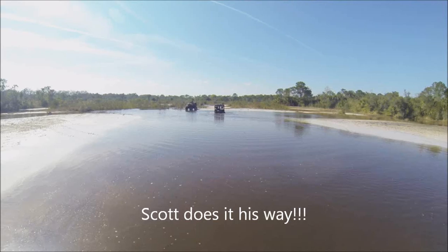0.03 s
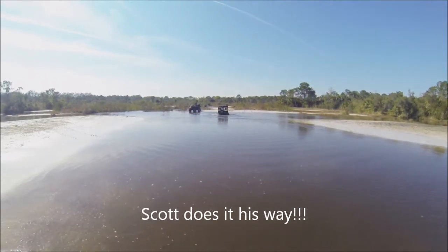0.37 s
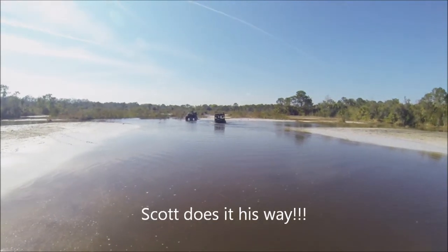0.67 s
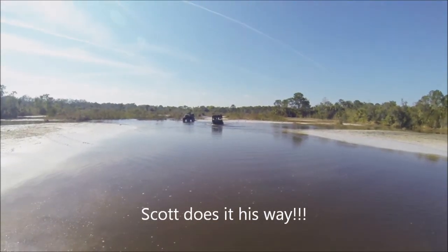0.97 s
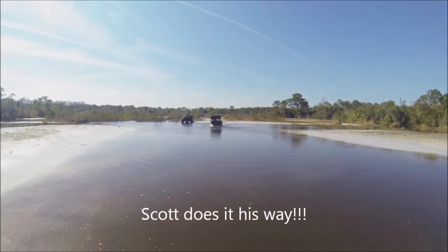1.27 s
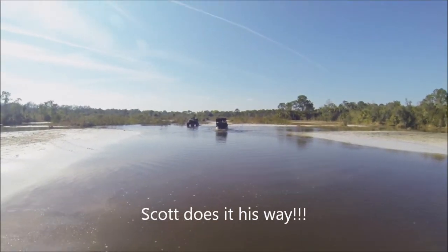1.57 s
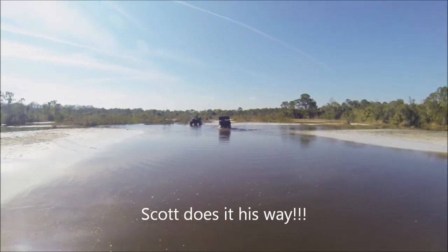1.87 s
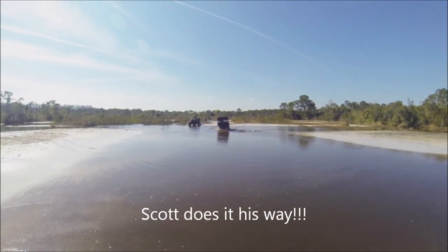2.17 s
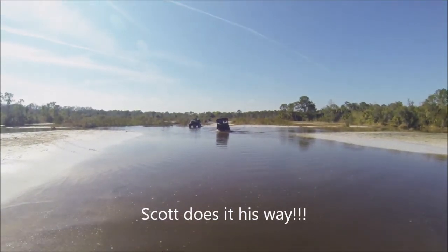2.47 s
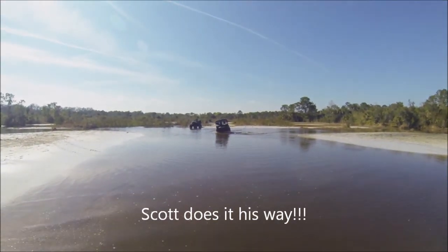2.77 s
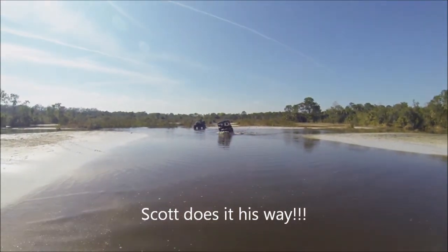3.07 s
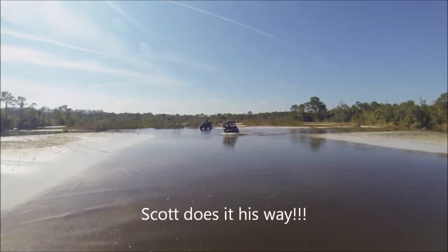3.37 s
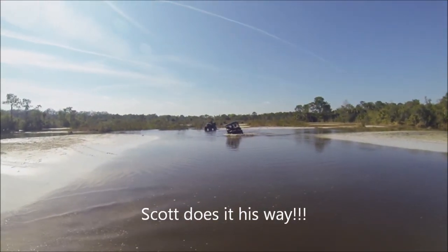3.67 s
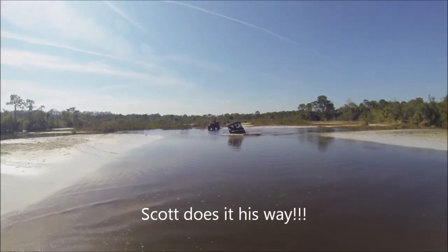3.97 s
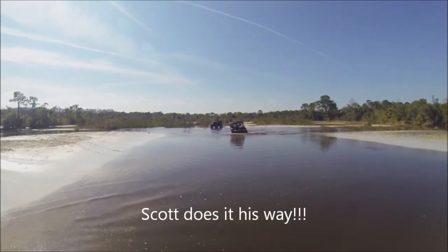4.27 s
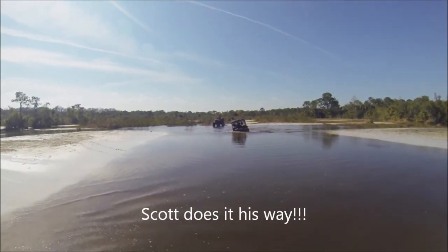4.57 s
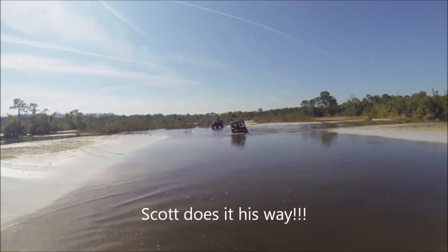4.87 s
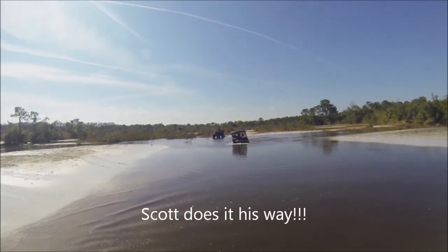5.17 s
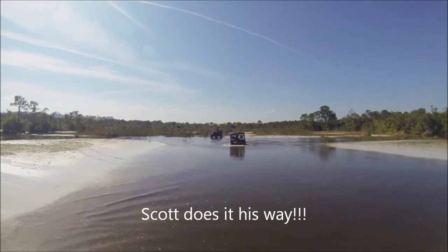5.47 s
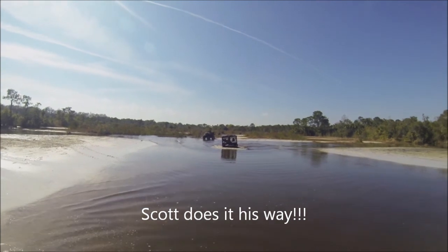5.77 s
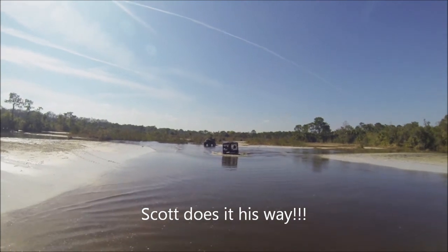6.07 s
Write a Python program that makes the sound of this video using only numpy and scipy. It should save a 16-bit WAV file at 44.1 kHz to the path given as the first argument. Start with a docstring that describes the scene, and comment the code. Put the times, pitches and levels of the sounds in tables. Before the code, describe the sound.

Low wind rumbles on a microphone inside a plastic case, over the faint drone of distant off-road vehicles and a soft wash of river water. A sharp click and scattered dull knocks sound right at the microphone. The mount rubs with a quick judder and gives a few faint squeaks. Near the end it creaks in a loud burst of sharp knocks, followed by one harder crack.

```python
"""A shallow river, with off-road vehicles wading through it far from the microphone.
The microphone sits in a camera's plastic case: wind rumbles on the shell, over a faint exhaust
drone and the wash of water. Right at the microphone something rubs on the mount, judders as it
sticks and slips, and squeaks; later the mount creaks in a burst of sharp knocks that ring the case."""
import sys
import numpy as np
from scipy import signal
from scipy.fft import rfft, irfft
from scipy.io import wavfile
from scipy.ndimage import uniform_filter1d

SR = 44100
rng = np.random.default_rng(int(sys.argv[2]) if len(sys.argv) > 2 else 0)


def wav_record(signal):
    """Record a signal, one row per channel, as 16-bit PCM in the file named by sys.argv[1]."""
    frames = np.transpose(np.atleast_2d(signal))
    bounded = np.clip(frames, -1, 1)
    # unit amplitude maps onto the largest positive 16-bit level
    quanta = np.round(bounded * 32767).astype(np.int16)
    wavfile.write(sys.argv[1], SR, quanta)


N = 269892
T = np.arange(N) / SR
HZ = np.fft.rfftfreq(N, 1 / SR)


def amp(db):
    """Decibels to gain."""
    return 10 ** (np.asarray(db) / 20)


def unit(x):
    """Scales to rms 1."""
    return x / np.sqrt(np.mean(x ** 2) + 1e-20)


def curve(rows, column=1):
    """One column of a table, joined by straight lines in time."""
    rows = np.asarray(rows, float)
    return np.interp(T, rows[:, 0], rows[:, column])


def during(start, end, attack, release):
    """Attack, hold at one, release."""
    return np.clip(np.minimum((T - start) / attack, (end - T) / release), 0, 1)


def build_up(start, length_s, depth_db):
    """A level in dB that climbs from depth_db below to zero, then holds."""
    return -depth_db * np.clip(1 - (T - start) / length_s, 0, 1)


def colour(points, hz=HZ):
    """Gain of a spectrum given as (frequency [Hz], level [dB]) points."""
    f, db = np.transpose(points)
    return amp(np.interp(np.log(hz + 1), np.log(f + 1), db))


def resonant(modes, hz=HZ):
    """Gain of a set of steep-sided resonances."""
    peaks = (amp(db) / (1 + ((hz ** 2 - f ** 2) / (hz * width + 1)) ** 2) for f, width, db in modes)
    return np.sqrt(sum(peak ** 2 for peak in peaks))


def filtered(x, gain):
    """Shapes the spectrum of x and scales to rms 1."""
    return unit(irfft(rfft(x) * gain, N))


def noise(gain):
    """Noise of rms 1 with the given spectrum."""
    return filtered(rng.standard_normal(N), gain)


def wander(hz):
    """Random drift of rms 1, up to about hz."""
    coarse = T[::32]
    f = np.fft.rfftfreq(len(coarse), coarse[1])
    slow = irfft(rfft(rng.standard_normal(len(coarse))) * np.exp(-(f / hz) ** 2), len(coarse))
    return np.interp(T, coarse, unit(slow))


def add(mix, start, sound):
    """Mixes a sound in at start seconds."""
    part = mix[max(round(start * SR), 0):][:len(sound)]
    part += sound[:len(part)]


def causal(gain):
    """The quickest impulse response that has this gain."""
    log_gain = np.log(np.maximum(np.r_[gain, gain[-2:0:-1]], gain.max() * 1e-5))
    return np.fft.ifft(np.exp(np.conj(signal.hilbert(log_gain)))).real


# wind at the microphone: (time [s], relative rumble level [dB], relative buffeting level [dB])
WIND_LEVELS = [(0.2, -44.5, -63), (0.35, -44.5, -73.5), (0.8, -37, -53), (1.55, -40, -56),
               (2.45, -39.5, -51), (2.6, -36, -57.5), (3.2, -42, -57.5), (3.35, -37, -56.5),
               (3.8, -44, -58), (3.95, -38, -59.5), (4.4, -43, -56.5), (4.85, -35.5, -47),
               (5.0, -31, -46.5), (5.45, -37, -53), (6.1, -36, -50.5)]
# spectra of the rumble and the buffeting: (frequency [Hz], level [dB])
RUMBLE_COLOUR = [(8, -17), (15, 1.5), (28, 2), (40, 2.5), (55, -3), (75, -7), (100, -12), (140, -27.5),
                 (220, -49), (600, -100)]
BUFFET_COLOUR = [(60, -20.5), (110, 2), (160, -3.5), (210, -8), (260, -14), (400, -18.5), (600, -26),
                 (1500, -54), (5000, -100)]
def wind(gain_db=1, gust_db=1.5, flutter_db=2.5):
    """Lumpy low turbulence right on the case, and faster buffeting above it."""
    gusts_db = gain_db + gust_db * wander(hz=3.8)
    rumble = noise(colour(RUMBLE_COLOUR)) * amp(curve(WIND_LEVELS) + gusts_db)
    buffet = noise(colour(BUFFET_COLOUR)) * amp(curve(WIND_LEVELS, column=2) + gusts_db)
    return rumble + buffet * amp(flutter_db * wander(hz=25))


# engine far out in the river: (time [s], firing rate [Hz], relative level [dB])
ENGINE_RUN = [(.07, 72.9, -56), (.6, 72.85, -50.5), (1.1, 72.23, -43), (1.6, 68.4, -47.5),
              (2.3, 70.44, -52), (2.75, 68, -47), (3.1, 69, -56.5), (3.92, 71.9, -47.5), (4.15, 63, -48),
              (4.5, 66.7, -53), (5.45, 66.65, -50.5), (6.12, 71.2, -45)]
# exhaust orders: (multiple of the firing rate [ratio], level [dB])
EXHAUST_ORDERS = [(1, 6), (1.5, -9), (2, -11), (2.5, -16.5), (3, -13)]
def engine(gain_db=-3.5, waver_db=2.0):
    """Only the lowest orders of the exhaust carry across the water; they waver."""
    firings = np.cumsum(curve(ENGINE_RUN) * (1 + .01 * wander(hz=9.9))) / SR
    drone = np.zeros(N)
    for order, db in EXHAUST_ORDERS:
        level = amp(db + waver_db * wander(hz=5.8))
        drone += level * np.sin(2 * np.pi * (order * firings + rng.random()))
    return unit(drone) * amp(curve(ENGINE_RUN, column=2) + gain_db)


# distant wash, slowly swelling and ebbing: (time [s], level [dB])
WASH_LEVELS = [(.15, -64.5), (.45, -71.5), (1, -67), (1.6, -56.5), (2.9, -56), (3.7, -62), (5.2, -63.5),
               (6.12, -55)]
# resonances of the air around the microphone in its case: (frequency [Hz], width [Hz], level [dB])
CAVITY_MODES = [(600, 1600, -19.5), (1373, 214, 1), (1684, 162, -2.5), (2177, 137, -5.5),
                (2490, 870, -17.5), (2827, 148, -17), (3070, 195, -13.5), (3510, 230, -16.5),
                (3940, 285, -15.5), (5040, 1160, -28.5)]
# thin whistles in the hiss: (frequency [Hz], width [Hz], level once swollen [dB])
WHINE_BANDS = [(5070, 91, -80), (10400, 250, -89), (11000, 200, -90)]
# background hiss: (frequency [Hz], level [dB])
HISS_COLOUR = [(200, 0), (500, 10.5), (1100, 9), (2000, 4), (3500, -2), (4500, -4), (5130, -3),
               (6500, -6.5), (8000, -6), (9500, -9.5), (11000, -16), (12000, -11), (15000, -15)]
def water(ripple_db=1.75, hiss_db=-66):
    """A restless wash heard through the case, over a hiss and thin whine that swell, then hold."""
    wash = noise(resonant(CAVITY_MODES)) * amp(curve(WASH_LEVELS) + ripple_db * wander(hz=40))
    whine = sum(amp(db) * noise(resonant([(f, width, 0)])) for f, width, db in WHINE_BANDS)
    hiss = amp(hiss_db) * noise(colour(HISS_COLOUR))
    return wash + (hiss + whine) * amp(build_up(0, length_s=0.98, depth_db=16.5))


# handling bumps: (time [s], envelope peak [dB], frequency [Hz], decay [s])
CASE_BUMPS = [(0.072, -21.5, 62.6, 0.0024), (0.083, -29.5, 309, 0.0025), (0.103, -31, 133, 0.0047),
              (.117, -25.5, 34.7, .0063), (.983, -39.5, 263, 0.0037), (5.328, -29.5, 187, 0.0019),
              (5.7907, -25.5, 352.6, 0.0011)]
def bumps():
    """Dull pushes on the case, each a heavily damped low swing."""
    out, t = np.zeros(N), T[:SR // 5]
    for start, db, hz, decay in CASE_BUMPS:
        envelope = t / decay * np.exp(1 - t / decay)
        add(out, start, amp(db) * envelope * np.sin(2 * np.pi * hz * t))
    return out


# knocks right at the microphone: (time [s], level of the blow over 5 ms [dB], hardness [dB])
CASE_KNOCKS = [(0.0739, -32.5, -3), (0.0992, -34, -12), (.1085, -23.5, 20), (0.3604, -56.5, 2),
               (0.724, -33, 0), (0.882, -39, 4.5), (.986, -41, -3), (1.041, -43, -2), (1.0516, -38.5, -1.5),
               (1.1413, -32.5, -5), (1.2049, -34, -5.5), (1.3165, -34, -5.5), (2.0995, -36.5, -4),
               (2.8657, -35.5, -3), (4.218, -35, -3.5), (4.3282, -35.5, -1), (4.4468, -37.5, 0),
               (4.7508, -27, 6), (4.852, -25, 2), (4.8835, -19.5, 0), (4.8925, -29.5, 2),
               (4.9233, -18.7, -1), (4.9432, -20, 1.5), (4.9458, -21.5, -8), (4.9865, -17, 1.5),
               (5.0099, -17.5, -0.5), (5.058, -14.5, 0.5), (5.0734, -18.5, -3), (5.1174, -15.5, 0.5),
               (5.155, -32, -18), (5.1731, -20, -0.5), (5.2273, -20, -2.5), (5.2475, -19, -1),
               (5.6721, -43, 4), (5.7922, -21.5, 5), (6.079, -9.5, 2), (6.0962, -20.5, -5)]
# the case's short ring, and the thud a soft blow adds: (frequency [Hz], width [Hz], level [dB])
CASE_MODES = [(210, 155, -12), (677, 244, -11), (812, 120, -7.5), (1272, 220, 0), (1634, 383, -1.7),
              (2458, 339, -17.5), (2895, 168, -17.5), (3320, 259, -24.7), (3730, 271, -18),
              (5178, 806, -27.6), (6484, 305, -41.2), (7821, 719, -44.7), (12000, 8000, -60)]
THUD_MODES = [(327, 450, -14), (1070, 200, -8.5)]
# a hard blow trades bass for treble: (frequency [Hz], gain per dB of hardness [dB/dB])
HARDNESS_TILT = [(800, -0.47), (1200, -0.17), (1800, 0.043), (2550, 1), (3600, 0.6), (5200, 0.53),
                 (9000, .75)]
# case modes that outlast a blow: (frequency [Hz], level [dB], t60 [s], starts flat by [share])
LONG_MODES = [(902, -25, 0.098, 0.059), (1330, -27, 0.027, 0.042), (3050, -34, 0.18, 0.035),
              (4114, -14, 0.026, .133)]
def knocks(detune=.022, spot_db=1.74, contact_hz=13200, bend_s=0.0022, ring_rise_s=0.011,
           rattle_db=-22, rattle_t60=0.0373, rattle_rise_s=0.0023):
    """Sharp blows ring the case for a few ms; a few longer modes and a faint rattle follow."""
    out, t = np.zeros(N), T[:4096]
    hz = np.fft.rfftfreq(len(t), 1 / SR)
    thud = resonant(THUD_MODES, hz)
    for start, db, hard_db in CASE_KNOCKS:
        force = np.interp(db, [-34, -22], [.1, 1])  # soft blows thud, strong ones start the long modes
        treble_loss = 1 + (1 - force) * (hz / contact_hz) ** 4
        tilt = colour(HARDNESS_TILT, hz) ** hard_db / treble_loss
        # each blow lands on another spot and favours other modes
        ring = resonant(CASE_MODES, hz * (1 + detune * rng.uniform(-1.15, 1)))
        spot = amp(spot_db * unit(uniform_filter1d(rng.standard_normal(len(hz)), size=25)))
        blow = causal(np.hypot(ring, (1 - force) * thud) * tilt * spot)
        blow *= np.sqrt(.005 * SR) / np.linalg.norm(blow)  # the energy of 5 ms at rms 1
        for f, mode_db, t60, flat in LONG_MODES:
            pitch = f * (1 + detune * rng.uniform(-1, 1)) * (1 - flat * np.exp(-t / bend_s))
            envelope = amp(mode_db - 60 * t / t60) * (1 - np.exp(-t / ring_rise_s))
            blow += force * envelope * np.sin(2 * np.pi * np.cumsum(pitch) / SR)
        add(out, start, blow * amp(db))
    tail = rng.standard_normal(len(t)) * amp(-60 * t / rattle_t60) * (1 - np.exp(-t / rattle_rise_s))
    rattle = signal.fftconvolve(out, tail / np.linalg.norm(tail))[:N]
    return out + amp(rattle_db) * rattle


# crunch of the sliding mount: (frequency [Hz], level [dB])
GRIT_COLOUR = [(800, -20), (3000, 15.5), (5500, -4), (7000, -9.5), (14000, -16)]
def grit(share_db=-38, delay_s=0.01, grain_db=3.0):
    """After each knock the mount slides on a little with a fine, bright crunch."""
    loudness, t = np.zeros(N), T[:4096]
    slide = (t / delay_s * np.exp(1 - t / delay_s)) ** 3
    for start, db, _ in CASE_KNOCKS:
        add(loudness, start, amp(db + share_db) * slide)
    return noise(colour(GRIT_COLOUR)) * loudness * amp(-grain_db * wander(hz=298))


# close scrapes of the mount: (time of peak [s], length [s], body level [dB], fizz level [dB])
MOUNT_SCRAPES = [(0.087, 0.054, -44, -72), (0.243, 0.13, -60.5, -90), (0.67, 0.14, -59.5, -86),
                 (0.894, 0.11, -55, -85), (4.704, 0.22, -42, -77), (4.86, .12, -53.5, -76),
                 (5.162, 0.097, -45.5, -80), (5.407, .12, -47, -91), (5.74, 0.23, -54, -84),
                 (5.95, 0.094, -51.5, -71.5), (6.11, 0.083, -46, -67)]
# spectra of the friction's body and its high fizz: (frequency [Hz], level [dB])
SCRAPE_COLOUR = [(450, -21), (640, -8), (1000, -13), (1240, -1.5), (1410, -3.5), (1620, 3.5), (1830, -4.5),
                 (2000, -11.5), (2600, -19.5), (3300, -14.5), (4200, -40), (5180, -23), (6340, -46),
                 (14000, -59)]
FIZZ_COLOUR = [(4000, -25), (5500, -7), (6500, -8), (7250, 1), (7900, 4), (9200, -5), (11000, 0),
               (12200, -5), (13600, 1), (15000, -7)]
def scrapes(grain_db=4):
    """Strokes of grainy friction swell and fade as the mount takes load, with a little fizz on top."""
    body, fizz = noise(colour(SCRAPE_COLOUR)), noise(colour(FIZZ_COLOUR))
    strokes = np.zeros(N)
    for peak_s, length, body_db, fizz_db in MOUNT_SCRAPES:
        swell = 1 / np.cosh(np.pi * np.clip((T - peak_s) / length, -10, 10))
        strokes += (amp(body_db) * body + amp(fizz_db) * fizz) * swell
    return strokes * unit(amp(grain_db * wander(hz=118)))


# stick-slip on the mount: (time [s], slip rate [Hz])
SLIP_RATE = [(1.2, 31), (1.45, 26), (1.82, 29.4), (1.97, 25), (2.15, 27.8), (2.55, 27.4)]
def judder(start=1.21, end=2.547, body_db=-51, sag_db_per_s=1, fizz_db=-69, uneven_db=0.5):
    """Each slip lets go a puff of friction noise that swells fast, rings in the case and dies away."""
    jitter, rise, body_fall, fizz_fall = .08, 0.062, 0.24, 0.46  # in slip cycles
    slips = np.cumsum(curve(SLIP_RATE) * (T >= SLIP_RATE[0][0])) / SR
    since_slip = (slips + jitter * wander(hz=11.4)) % 1
    swell = np.exp(-(1 - since_slip) / rise)
    body_puffs = (swell + np.exp(-since_slip / body_fall)) * rng.standard_normal(N)
    fizz_puffs = (swell + np.exp(-since_slip / fizz_fall)) * rng.standard_normal(N)
    body = filtered(body_puffs, resonant(CAVITY_MODES)) * amp(body_db - sag_db_per_s * (T - start))
    fizz = filtered(fizz_puffs, colour(FIZZ_COLOUR))
    fizz *= amp(fizz_db + build_up(start, length_s=0.48, depth_db=15))
    envelope = during(start, end, attack=0.018, release=0.051)
    return (body + fizz) * amp(uneven_db * wander(hz=23.8)) * envelope


# close squeaks of the mount: (start [s], length [s], top pitch [Hz], time to the top [s],
# fall of pitch 0.1 s from the top [share], level off resonance [dB])
MOUNT_SQUEAKS = [(2.5, 0.12, 1176, 0.091, .22, -61), (3.15, .12, 1186, .025, 0.15, -62.5),
                 (3.417, 0.12, 1121, .02, 0.0683, -65.5)]
# their partials: (multiple of the pitch [ratio], level [dB])
SQUEAK_PARTIALS = [(1, -6), (2, 0), (3, -8), (4, -22)]
def squeak(start, length, top_hz, top_s, fall, level_db, waver=.024, flutter_db=3):
    """Slips run together into a thin, unsteady tone that arches in pitch and swells at a resonance."""
    ring_hz, ring_width_hz, ring_db = 1061, 37, 8  # near this pitch the second partial rings in the case
    pitch = top_hz * np.maximum(1 - fall * (10 * (T - start - top_s)) ** 2, .5)
    turns = np.cumsum(pitch * (1 + waver * wander(hz=200))) / SR
    tone = unit(sum(amp(db) * np.sin(2 * np.pi * k * turns) for k, db in SQUEAK_PARTIALS))
    boost_db = ring_db / (1 + ((pitch - ring_hz) / ring_width_hz) ** 2)
    level = amp(level_db + boost_db + flutter_db * wander(hz=60))
    return tone * level * during(start, start + length, attack=.03, release=.03)


def scene():
    """The far river and the close noises of wind, case and mount, all at one microphone."""
    rubbing = judder() + sum(squeak(*row) for row in MOUNT_SQUEAKS) + scrapes()
    return (wind() + engine() + water() + rubbing + knocks() + grit() + bumps())[None]


def record(dry):
    """The microphone opens after a moment, overloads at full scale and is band-limited."""
    open_s, fade_s, edge_hz = .064, .005, 15400
    opening = np.clip((T - open_s) / fade_s, 0, 1)
    clipped = np.clip(dry * opening, -1, 1)
    lowpass = signal.firwin(255, edge_hz, window=("kaiser", 8), fs=SR)
    return signal.oaconvolve(clipped, lowpass[None], "same")


dry = scene()
out = record(dry)
wav_record(out)
```